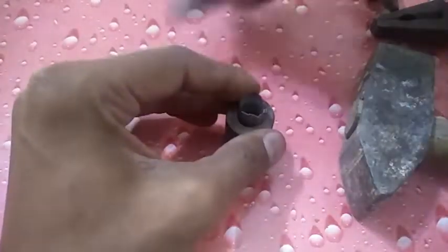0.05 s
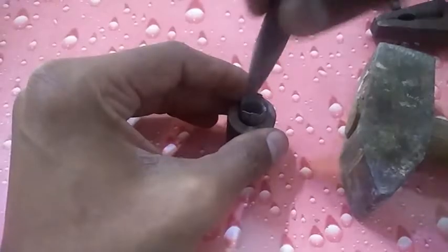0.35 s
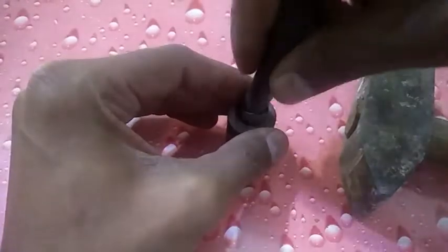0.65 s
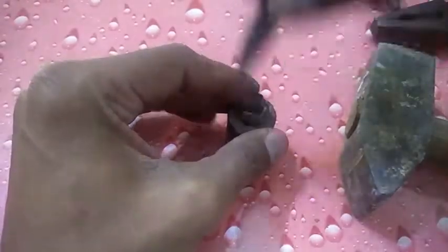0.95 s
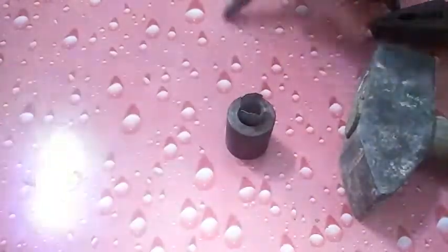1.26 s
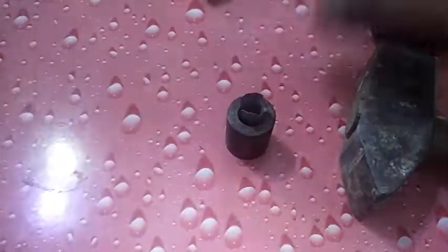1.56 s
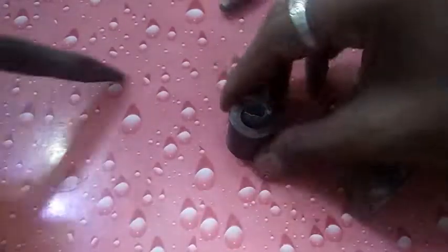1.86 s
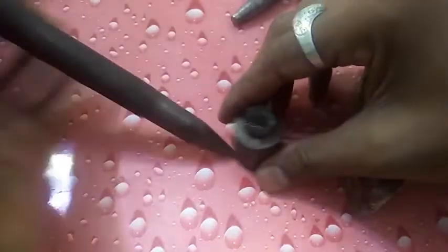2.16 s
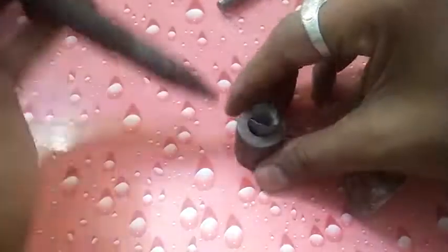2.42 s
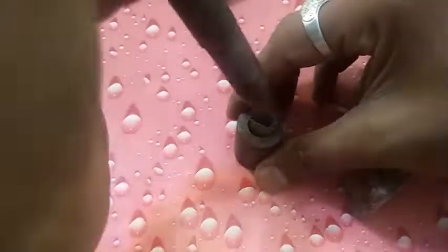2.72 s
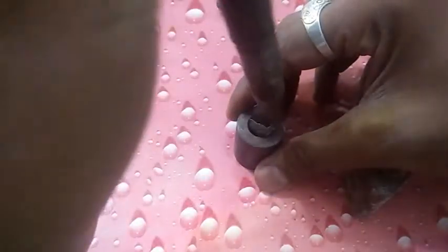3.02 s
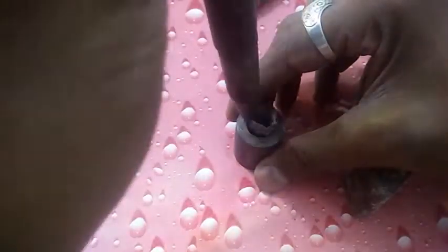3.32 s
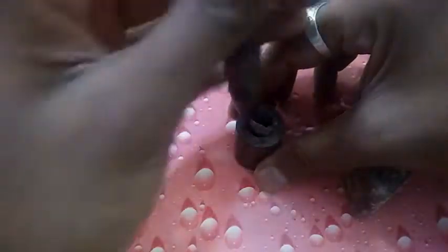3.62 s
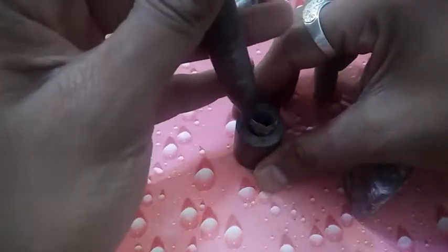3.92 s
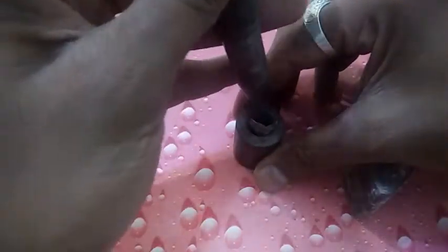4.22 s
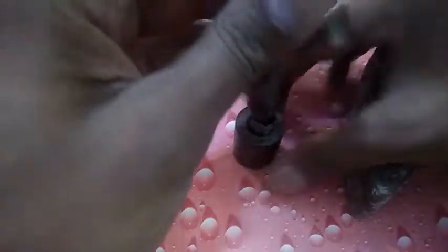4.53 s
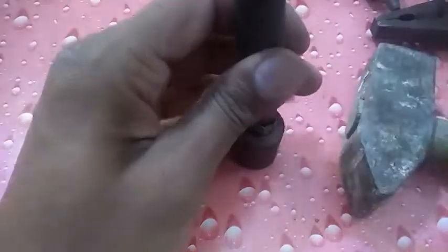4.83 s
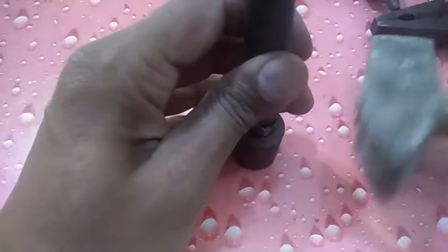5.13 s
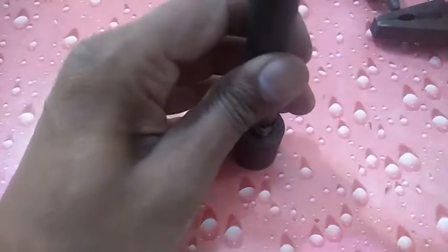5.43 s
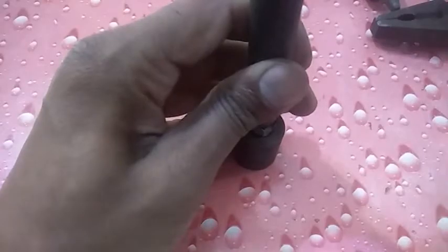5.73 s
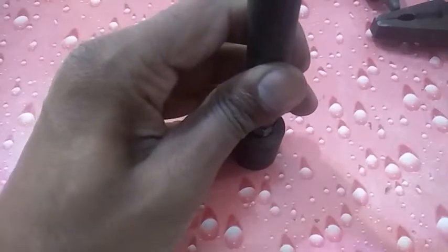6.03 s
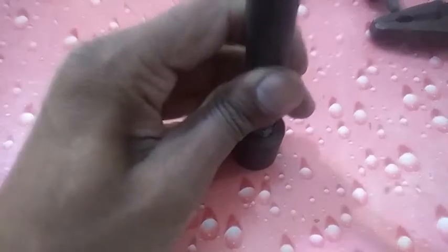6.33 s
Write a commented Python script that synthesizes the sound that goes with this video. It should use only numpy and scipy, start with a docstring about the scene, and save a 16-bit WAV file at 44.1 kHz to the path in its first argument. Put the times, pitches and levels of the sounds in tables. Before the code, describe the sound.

Light taps and tiny metal squeaks give way to heavy knocks as steel tools land on a covered table nearby. Scattered clacks and clinks follow as a punch is set into a die, while a vehicle passes outside with a low hum and faint far horn toots. After a few softer knocks, two quick hammer blows land on the punch, dull and briefly ringing, in a small room with a low town rumble behind.

```python
"""Small, hard room, plastic-covered table. A pick works at a die, steel tools are put down, a hammer
strikes the punch twice. Contacts thud in the tabletop and clack; steel on steel also rings. Rubbing
surfaces stick and slip, giving scrapes and squeaks. Outside, a motor vehicle passes with tyre noise
and exhaust drone; a far horn toots and a faint whine rises over town rumble."""
import sys
import numpy as np
from scipy import signal
from scipy.fft import rfft, irfft
from scipy.io import wavfile
from scipy.ndimage import uniform_filter1d, minimum_filter1d

SR = 44100
rng = np.random.default_rng(int(sys.argv[2]) if len(sys.argv) > 2 else 0)


def generate_wav(signal):
    """Clip the signal to [-1, 1] and save it as 16-bit WAV at the path in sys.argv[1]."""
    frames = np.transpose(np.atleast_2d(signal))
    scaled = np.clip(frames, -1, 1) * 32767
    pcm = np.round(scaled).astype(np.int16)
    wavfile.write(sys.argv[1], SR, pcm)


N = 280917
TIME_S = np.arange(N) / SR
EVENT_S = TIME_S[:SR]

# hammer on punch, each blow lands twice: t/s, thud/dB, thud f/Hz, clack/dB, ring/dB, room send/dB
HAMMER_HITS = [(5.7170, -4, 127.6, -1.5, -18.5, -13), (5.725, 2, 216, -4.5, -29.5, -5),
               (6.052, 5, 184, -8.5, -19.5, -3.5), (6.056, -10.5, 258, -18, -35, -9)]
# punch tip on die: t/s, thud/dB, thud f/Hz, clack/dB, clack f/Hz, tilt/(dB/oct), crack/dB, ring/dB
TIP_TOUCHES = [(2.0221, -24, 413, -26.5, 895, -3, -39, -63), (2.2826, -1, 336, -8, 800, -3.5, -16.5, -16.5),
               (3.368, -9, 255, -6.5, 1070, -6.5, -21, -29), (4.5658, -15, 291, -23, 900, -6, -46, -47),
               (5.172, -31, 199, -37, 734, 4, -42, -51)]
# knocks on the table, two followed by a quick, faint echo:
# t/s, thud/dB, thud f/Hz, clack/dB, clack f/Hz, tilt/(dB/oct), room send/dB
TABLE_KNOCKS = [ (0.002, -21.5, 250, -34.5, 690, -6, 6), (0.9716, -15.5, 228, -37, 513, -4, -4.5),
                (1.3003, 5.5, 231, -2.5, 666, -5.5, -5.5), (1.3205, -21, 260, -24, 690, 1.5, 2.5),
                (1.4380, -8, 386, -30, 690, 0, 9.5), (1.4438, -2.5, 260, -2, 696, 1, -2),
                (1.46, -11, 264, -26.5, 760, -4, 7), (2.7290, -21.5, 444, -28, 762, -3, -13),
                (2.8508, -8.5, 298, -13, 1050, -11, -4), (4.968, -12, 243, -20, 690, 0, -2),
                (4.9727, -9.5, 235, -28, 810, 1, -5), (5.2, -19, 84.4, -33.5, 810, 3, 1.5),
                (5.259, -19.5, 74, -42, 600, -5, -27), ]
# light finger and tool taps: t/s, level/dB
LIGHT_TAPS = [(0.2212, -28), (0.3395, -27.5), (0.4828, -30.5), (0.5814, -29), (0.6668, -24.5),
              (0.699, -25.5), (0.723, -29), (0.779, -26.5), (0.89, -30), (0.958, -30), (1.072, -33),
              (1.134, -38.5), (2.94, -23), (3.903, -34), (3.943, -31.5), (4.022, -36)]
# steel scraping steel, things sliding on the table: t/s, length/s, scrape/dB, slide/dB
RUB_STROKES = [(0.667, 0.097, -73, -30), (0.977, 0.038, -70.5, -31), (1.02, 0.013, -52, -54),
               (3.947, 0.095, -90, -42), (4.392, 0.056, -80, -35), (4.519, 0.056, -61, -34),
               (4.935, 0.031, -80, -42), (5.016, 0.052, -82.5, -33), (5.145, 0.051, -59, -36.5),
               (5.17, 0.0043, -45.5, -52), (6.1, 0.069, -101.5, -25)]
# steel edges grating: t/s, length/s, centre f/Hz, level/dB
GRATE_STROKES = [(1.887, 0.019, 3280, -57), (2.018, 0.008, 2400, -38.5), (2.219, 0.044, 2470, -47.5),
                 (2.238, 0.022, 3380, -55), (4.967, 0.011, 1950, -35), (5.114, 0.02, 2300, -57),
                 (5.173, 0.006, 2530, -42), (5.185, 0.021, 2270, -47.5)]
# stick-slip squeaks: t/s, length/s, f/Hz, glide/(Hz/s), level/dB
STEEL_SQUEAKS = [(0.664, 0.085, 3740, 0, -68), (0.977, 0.048, 1920, -3, -60.5),
                 (1.021, 0.017, 1420, 2, -55.5), (4.475, 0.035, 11400, 0, -70),
                 (4.51, 0.045, 11600, -12000, -66)]

# modes of tabletop and tools: f/Hz, level/dB, t60/s
TABLE_MODES = [(83, -59.5, 0.27), (109.7, -20, 0.29), (173.7, -21.5, 0.73), (178, -36, 0.21),
               (205.8, -16.5, 0.64), (256, -36.5, 0.36), (251, -10, 0.18), (286.3, -31, 1),
               (322, -16.5, 0.38), (395.5, -14.5, 0.49), (486.5, -16, 0.47), (636.6, -3.5, 0.14),
               (720, -26, .35)]
PUNCH_MODES = [(3260, -31.5, .22), (3400, -29, .15), (3550, -7, 0.065), (3590, -10.5, 0.064),
               (3570, -27.5, 0.26), (8720, -29, .18), (8740, -19, .05), (8950, -24.5, .03),
               (8840, -38, 0.28)]
DIE_MODES = [(2580, 5, .022), (2880, 4, .022), (3440, 8, .035), (6700, -14, .02), (8592, -23, .2),
             (12398, -22.5, .33), (12425, -27, .13), (14350, -26, .12)]
PICK_MODES = [(9889, -12, .2), (10700, -10, .1), (12180, -9, .3), (12360, 0, .33)]
# tabletop clack and edge grate spectra: f/nominal f, density/dB
CLACK_SPECTRUM = [(.25, -13.5), (.6, 13), (1.05, 8), (1.6, 2), (2.1, 2.5), (2.6, -6.5), (3.2, -7.5),
                  (4.5, -19.5), (5.7, -35), (16, -67)]
GRATE_SPECTRUM = [(.3, -22.5), (.75, -8.5), (1, -2), (1.15, -15.5), (1.4, -24), (2, -43), (5, -57)]
# steel crack, finger tap, steel scrape and table slide spectra: f/Hz, density/dB
CRACK_SPECTRUM = [(600, -35.5), (1200, 23.5), (1900, 9), (2550, 18), (3500, 15.5), (4200, 0), (5600, -7.5),
                  (7000, -8.5), (8800, -7), (11000, -18.5), (15000, -21.5)]
TAP_SPECTRUM = [(80, 4), (250, 9), (450, 11.5), (720, 6), (1000, -7.5), (1380, -4), (1750, -52.5),
                (4000, -50), (10000, -64.5)]
SCRAPE_SPECTRUM = [(2000, -10.5), (2700, -2), (3000, -5.5), (3400, -23), (5000, -16.5), (7000, -10.5),
                   (7800, 0), (8800, -7), (9650, 3.5), (10400, -2), (11350, 7), (12600, -3.5), (15000, -23)]
SLIDE_SPECTRUM = [(50, -20), (120, -7.5), (260, 4), (370, -4), (520, -12), (800, -20.5), (1400, -48),
                  (3000, -58), (8000, -86.5)]

# tyre and town noise spectra: f/Hz, density/dB
TYRE_SPECTRUM = [(76, -46), (130, -6), (156, -7), (185, 2), (306, -2.5), (345, -11.5), (522, -16.5),
                 (1280, -30.5), (1470, -28.5), (1620, -37.5), (2400, -44), (3360, -65.5), (5000, -88.5),
                 (6500, -81), (11000, -120)]
TOWN_SPECTRUM = [(15, -25.5), (25, -12.5), (113, -5), (133, -8), (152, -14.5), (204, -37), (582, -32.5),
                 (684, -29.5), (848, -40), (1110, -35), (1240, -43), (1950, -42.5), (7100, -56.5),
                 (15500, -53)]
# tyre treble tilt before distance loss: t/s, tilt/(dB/oct)
TYRE_TILT = [(1.25, 2), (1.55, 7.5), (1.85, 5), (2.15, 3), (2.5, 2.5), (2.8, 4.5), (3.05, 5), (3.3, 4),
             (3.7, 9)]
# far horn: t/s, hold/s, level/dB
HORN_TOOTS = [(3.563, 0.1, -48.5), (3.81, 0.05, -53.5), (4.195, 0.094, -50.5), (4.37, 0.12, -59.5)]
# room decay: f/Hz, t60/s
ROOM_DECAY = [(100, 0.94), (250, 0.78), (600, 0.31), (1500, 0.49), (3500, 0.38), (8000, 0.43),
              (15000, 0.35)]

TOP_HZ = 15800


def impacts():
    """All contacts; their thuds drive the tabletop modes."""
    thuds, clacks, cracks, rings, send = np.zeros((5, N))
    for t_s, room_db, sounds in contacts():
        for track, sound, offset_db in zip((thuds, clacks, cracks, rings), sounds, (-5, 1, -6.5, -1)):
            add(track, t_s, sound)
            add(send, t_s, undb(room_db + offset_db) * sound)
    # clacks low-passed, little treble above 4.5 kHz
    clacks = signal.sosfilt(signal.butter(2, 4500, fs=SR, output="sos"), clacks)
    tabletop = undb(-40.5) * signal.fftconvolve(thuds, ring(TABLE_MODES))[:N]
    return thuds + tabletop + clacks + cracks + rings + room(send)


def contacts():
    """Hammer blows, tip touches and table knocks as (t/s, room send/dB, sounds)."""
    for t_s, thud_db, thud_hz, clack_db, punch_db, room_db in HAMMER_HITS:
        sounds = contact(thud_db, thud_hz, clack_db, clack_hz=790, tilt_db_oct=0, crack_db=clack_db - 2,
                         punch_db=punch_db, die_rel_db=-10, t60_scale=0.3)  # fist damps the punch
        yield t_s, room_db, sounds
    for t_s, *touch in TIP_TOUCHES:
        yield t_s, -5.5, contact(*touch)
    for t_s, thud_db, thud_hz, clack_db, clack_hz, tilt_db_oct, room_db in TABLE_KNOCKS:
        crack_db = clack_db - 28.5  # cover leaves little crack
        yield t_s, room_db, contact(thud_db, thud_hz, clack_db, clack_hz, tilt_db_oct, crack_db)


def contact(thud_db, thud_hz, clack_db, clack_hz, tilt_db_oct, crack_db,
            punch_db=-np.inf, die_rel_db=-np.inf, t60_scale=1):
    """Thud, clack, crack, steel ring. Force builds up, then the loaded tabletop swings a few cycles."""
    thud = 2.116 * ring([(thud_hz, thud_db, 4.04 / thud_hz)]) * rise(0.2 / thud_hz)
    spectrum = [(ratio * clack_hz, db + tilt_db_oct * np.log2(ratio)) for ratio, db in CLACK_SPECTRUM]
    clack = undb(clack_db) * click(spectrum, chatter=0.091, t60_s=0.024)
    crack = undb(crack_db) * click(CRACK_SPECTRUM, chatter=0.16, t60_s=0.017)
    punch = ring([(hz, db, t60_scale * t60_s) for hz, db, t60_s in PUNCH_MODES])
    steel = undb(punch_db) * (punch + undb(die_rel_db) * ring(DIE_MODES))
    rattle = 1 + 0.4 * wander(180)[:SR]  # punch loose in grip and die
    return thud, clack, crack, steel * rattle * rise(0.0007)


def click(spectrum, chatter, t60_s, size=2048):
    """Sharp minimum-phase pulse, drawn out by pitchless surface chatter."""
    cepstrum = irfft(np.log(undb(at_hz(spectrum, np.fft.rfftfreq(size, 1 / SR)))))
    pulse = irfft(np.exp(rfft(2 * cepstrum[:size // 2], size)))
    force = chatter * (rng.standard_normal(SR) * decay(t60_s))[:size]
    force[0] = 1
    phase_rad = np.angle(rfft(force, 2 * size))
    flat_force = irfft(np.exp(1j * phase_rad))[:size] * np.linalg.norm(force)
    return signal.fftconvolve(flat_force, pulse / np.abs(pulse).max())


def ring(modes):
    """Free ringing of a struck body."""
    return sum(undb(db) * decay(t60_s) * np.sin(2 * np.pi * hz * EVENT_S) for hz, db, t60_s in modes)


def handling():
    """Taps, rubs, squeaks, pick put down. The tabletop radiates into the room; the steel is close."""
    tabletop, steel = np.zeros((2, N))
    for t_s, db in LIGHT_TAPS:
        add(tabletop, t_s, undb(db + 2) * click(TAP_SPECTRUM, chatter=0.079, t60_s=0.053))
    for t_s, length_s, scrape_db, slide_db in RUB_STROKES:
        add(steel, t_s, undb(scrape_db) * rub(length_s, SCRAPE_SPECTRUM, slips_per_s=350))
        add(tabletop, t_s, undb(slide_db) * rub(length_s, SLIDE_SPECTRUM))
    for t_s, length_s, hz, db in GRATE_STROKES:
        spectrum = [(ratio * hz, density_db) for ratio, density_db in GRATE_SPECTRUM]
        add(steel, t_s, undb(db) * rub(length_s, spectrum))
    for t_s, length_s, hz, glide_hz_s, db in STEEL_SQUEAKS:
        add(steel, t_s, undb(db) * squeak(length_s, hz, glide_hz_s))
    steel += pick_squeak()
    add(steel, t_s=1.45, sound=undb(-59) * ring(PICK_MODES))
    return undb(-0.5) * tabletop + steel + room(undb(-2) * tabletop + undb(-10) * steel)


def rub(length_s, spectrum, slips_per_s=600):
    """One stroke of random, gritty slips."""
    slips = rng.standard_normal(SR) * (rng.random(SR) < slips_per_s / SR)
    return pressure(length_s) * colour(slips, spectrum)


def squeak(length_s, hz, glide_hz_s):
    """Stick-slip at an unsteady rate; tip resonances select a few high partials."""
    jitter = 1 + 0.016 * wander(700)[:SR]
    phase_rad = phase((hz + glide_hz_s * np.minimum(EVENT_S, length_s)) * jitter)
    slips = sum(np.sin(k * phase_rad) for k in range(1, int(TOP_HZ / hz) + 1))
    flutter_db = 2.9 * wander(150)[:SR]
    return pressure(length_s) * colour(slips * undb(flutter_db), SCRAPE_SPECTRUM)


def pick_squeak(t_s=0.98, glide_hz_s=4400):
    """Rising squeak as the pick leaves the die."""
    level_db = -53 + swell_db(t_s, hold_s=0.053, attack_db_s=1500, release_db_s=1500)
    return undb(level_db) * narrowband(2840 + glide_hz_s * (TIME_S - t_s), width_hz=600)


def pressure(length_s):
    """Arched pressure of one stroke."""
    return np.sqrt(np.sin(np.pi * np.minimum(EVENT_S / length_s, 1)).clip(0))


def vehicle():
    """Nears, revs up once, recedes, then is screened by a wall."""
    distance_db = swell_db(1.946, hold_s=1.383, attack_db_s=5, release_db_s=10)
    screen_db = -54.5 * np.maximum(TIME_S - 3.87, 0)
    revs = np.interp(TIME_S, [2.3, 2.8], [0, 1])
    return (tyres(revs, distance_db) + exhaust(revs)) * undb(distance_db + screen_db)


def tyres(revs, distance_db):
    """Road noise: lifted by the revs, duller with distance."""
    level_db = -34.5 + 1.5 * revs
    tilt_db_oct = np.interp(TIME_S, *np.transpose(TYRE_TILT)) + 2.25 * distance_db
    noise = colour(rng.standard_normal(N), TYRE_SPECTRUM)
    return sum(band * undb(level_db + tilt_db_oct * max(np.log2(hz / 300), 0) + 1.1 * wander(15))
               for hz, band in bands(noise))


def exhaust(revs, idle_hz=71.83, revved_hz=102.8):
    """Uneven firings, scattered by house fronts; booms while the pipe points at the house."""
    firing_hz = idle_hz + (revved_hz - idle_hz) * revs
    phase_rad = phase(firing_hz * (1 + 0.0374 * wander(30)))
    scatter = undb(2) * narrowband(firing_hz, width_hz=64)
    drone = unit_rms(np.sin(phase_rad) + undb(-18) * np.sin(2 * phase_rad) + scatter)
    boom_db = np.maximum(19.5 + swell_db(3.346, hold_s=0.11, attack_db_s=30, release_db_s=20), 0)
    return drone * undb(-42.5 + boom_db + 0.5 * wander(21.68))


def horn(hz=608, smear_hz=90):
    """Two-partial toots, smeared by distance."""
    envelope = sum(undb(db + swell_db(t_s, hold_s, attack_db_s=226, release_db_s=123))
                   for t_s, hold_s, db in HORN_TOOTS)
    return envelope * (undb(2) * narrowband(hz, smear_hz) + undb(-2.5) * narrowband(2 * hz, smear_hz))


def whine(t_s=3.9, glide_hz_s=220):
    """Faint, far tone climbing steadily."""
    level_db = -53 + swell_db(t_s, hold_s=0.35, attack_db_s=21, release_db_s=87)
    return undb(level_db) * narrowband(742 + glide_hz_s * (TIME_S - t_s), width_hz=230)


def town(corner_hz=900):
    """Wandering low rumble, even hiss."""
    noise = undb(-43.5) * colour(rng.standard_normal(N), TOWN_SPECTRUM)
    return sum(band * undb((3 + 2.5 * wander(2.2)) / (1 + (hz / corner_hz) ** 2))
               for hz, band in bands(noise))


def room(x, build_cycles=3.4):
    """Nearest-wall reflection plus dense tail; bass builds last and lingers longest."""
    tail = sum(band * decay(at_hz(ROOM_DECAY, hz)) * rise(build_cycles / hz)
               for hz, band in bands(rng.standard_normal(SR)))
    response = unit_rms(tail) / np.sqrt(SR)
    add(response, t_s=0.0135, sound=undb([-9.5]))
    return signal.fftconvolve(x, response)[:N]


def narrowband(hz, width_hz):
    """Tone smeared into a noise band."""
    phase_rad = phase(np.broadcast_to(hz, N))
    return (wander(width_hz) * np.sin(phase_rad) + wander(width_hz) * np.cos(phase_rad)) / np.sqrt(2)


def wander(rate_hz):
    """Smooth random curve, rms 1."""
    size = int(SR / rate_hz)
    steps = np.repeat(rng.standard_normal(N // size + 1), size)
    return unit_rms(uniform_filter1d(uniform_filter1d(steps, size), size)[:N])


def colour(x, spectrum):
    """Filter by a spectrum, rms 1."""
    gain = undb(at_hz(spectrum, np.fft.rfftfreq(len(x), 1 / SR)))
    return unit_rms(irfft(rfft(x) * gain, len(x)))


def bands(x, count=20):
    """Overlapping half-octave bands as (f/Hz, signal)."""
    centres_hz = np.geomspace(25, 16000, count)
    bins_hz, spectrum = np.fft.rfftfreq(len(x), 1 / SR), rfft(x)
    return [(hz, irfft(spectrum * np.interp(bins_hz, centres_hz, weights), len(x)))
            for hz, weights in zip(centres_hz, np.eye(count))]


def at_hz(points, hz):
    """Interpolate (f/Hz, value) over log frequency."""
    points_hz, values = np.transpose(points)
    return np.interp(np.log(np.maximum(hz, 1)), np.log(points_hz), values)


def swell_db(t_s, hold_s, attack_db_s, release_db_s):
    """Climb to 0 dB at t_s, hold, fall; slopes in dB/s."""
    since_s = TIME_S - t_s
    return attack_db_s * np.minimum(since_s, 0) - release_db_s * np.maximum(since_s - hold_s, 0)


def rise(tau_s):
    return 1 - np.exp(-EVENT_S / tau_s)


def decay(t60_s):
    return np.exp(-np.log(1000) * EVENT_S / t60_s)


def phase(hz):
    return 2 * np.pi * np.cumsum(hz) / SR


def undb(db):
    return 10 ** (np.asarray(db) / 20)


def unit_rms(x):
    return x / np.sqrt(np.mean(x ** 2))


def add(track, t_s, sound):
    start = int(t_s * SR)
    track[start:start + len(sound)] += sound[:max(N - start, 0)]


def scene():
    """Table close by, street behind; mono."""
    return (impacts() + handling() + vehicle() + horn() + whine() + town())[None]


def record(dry):
    """Microphone bass roll-off, peak limiter, top cut."""
    x = signal.sosfilt(signal.butter(2, 36, "high", fs=SR, output="sos"), dry)
    release_db_s, smooth_samples = 110, 45
    over_db = 20 * np.log10(np.maximum(np.abs(x), 1))
    recovery_db = release_db_s * TIME_S
    gain = undb(recovery_db - np.maximum.accumulate(over_db + recovery_db))
    gain = minimum_filter1d(gain, 2 * smooth_samples)
    gain = uniform_filter1d(uniform_filter1d(gain, smooth_samples), smooth_samples)
    return signal.sosfilt(signal.ellip(8, .2, 70, TOP_HZ, fs=SR, output="sos"), x * gain)


dry = scene()
out = record(dry)
generate_wav(out)
```